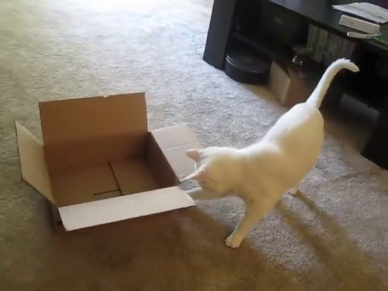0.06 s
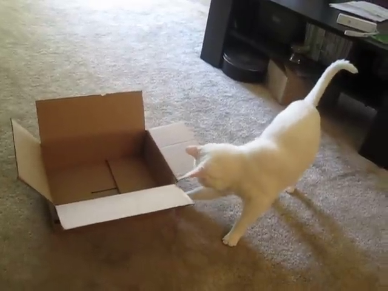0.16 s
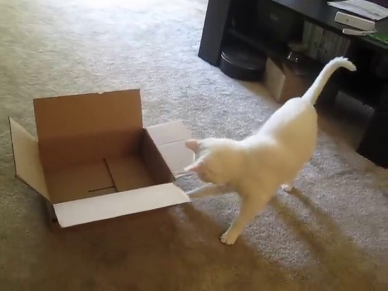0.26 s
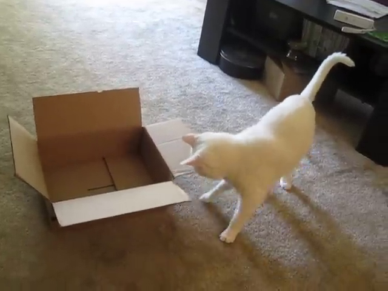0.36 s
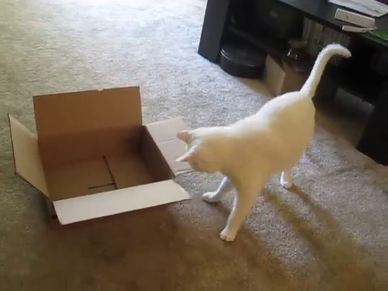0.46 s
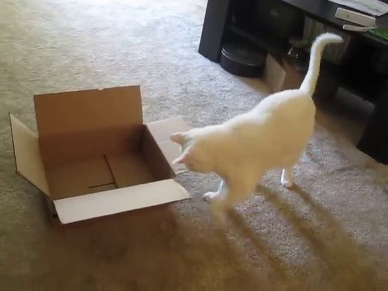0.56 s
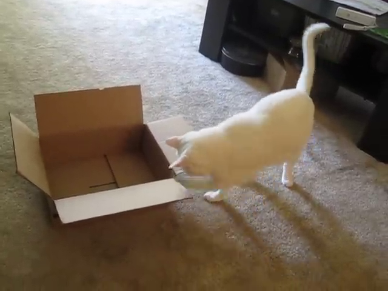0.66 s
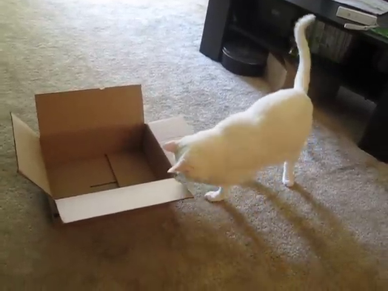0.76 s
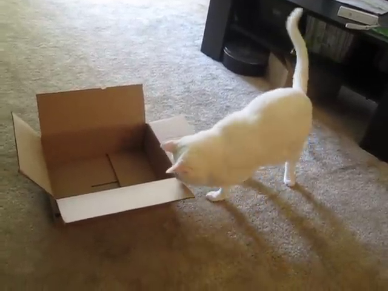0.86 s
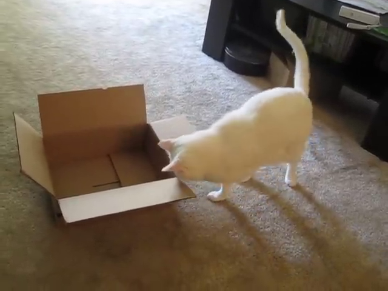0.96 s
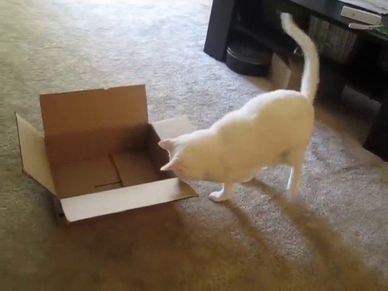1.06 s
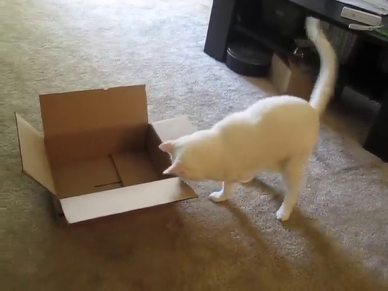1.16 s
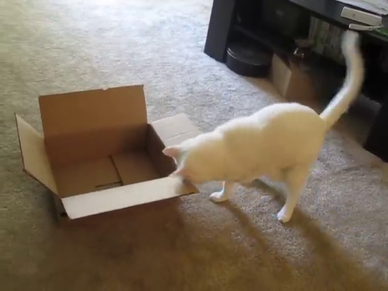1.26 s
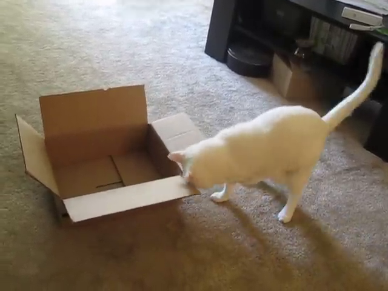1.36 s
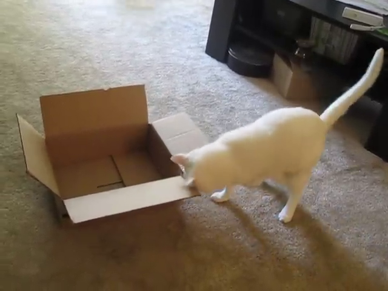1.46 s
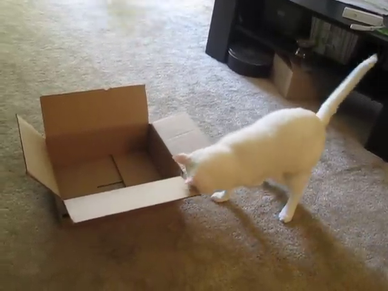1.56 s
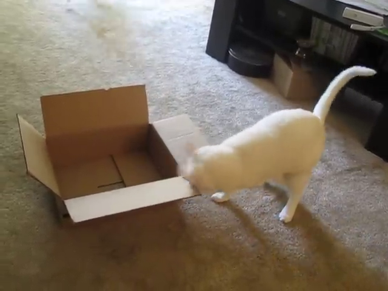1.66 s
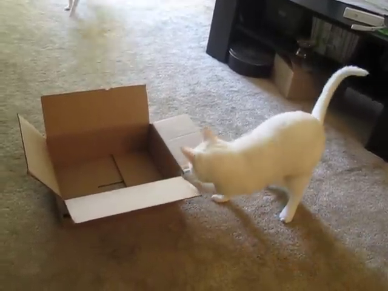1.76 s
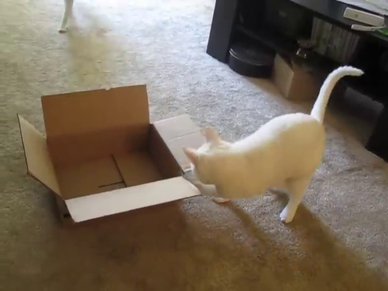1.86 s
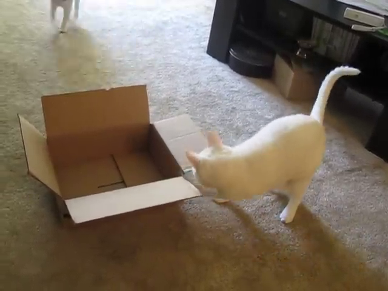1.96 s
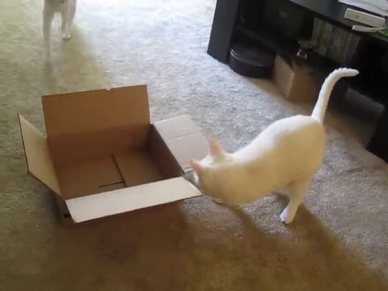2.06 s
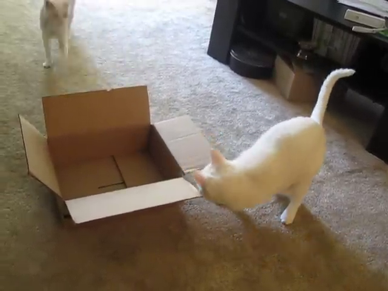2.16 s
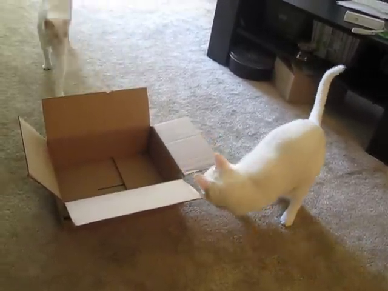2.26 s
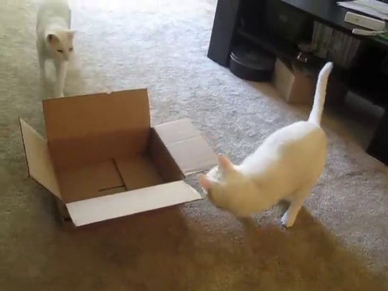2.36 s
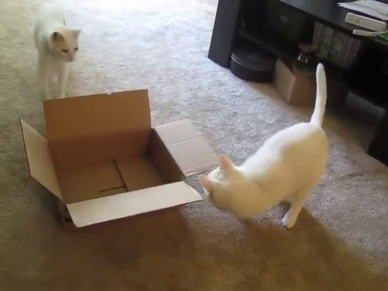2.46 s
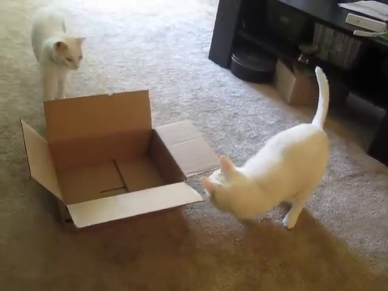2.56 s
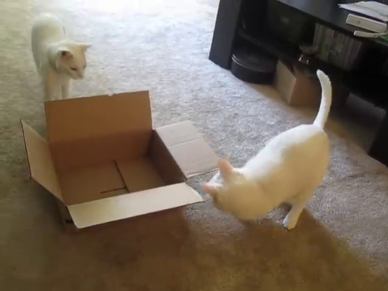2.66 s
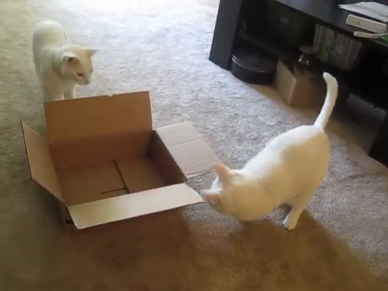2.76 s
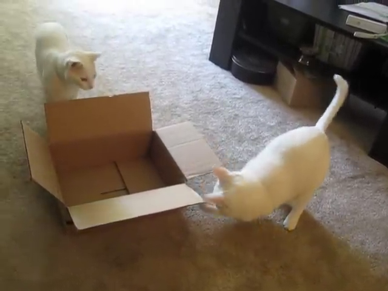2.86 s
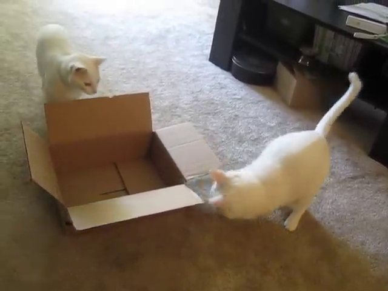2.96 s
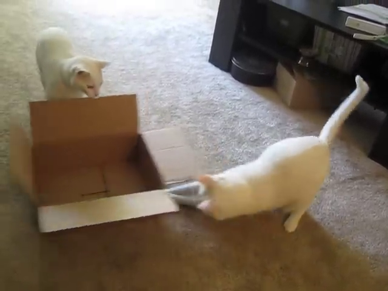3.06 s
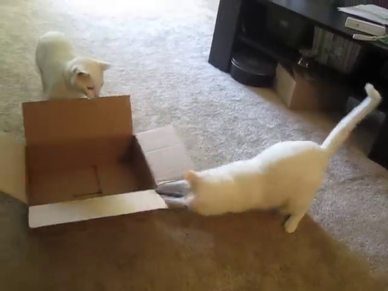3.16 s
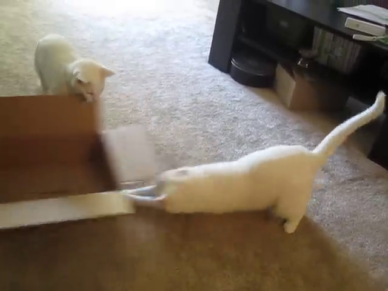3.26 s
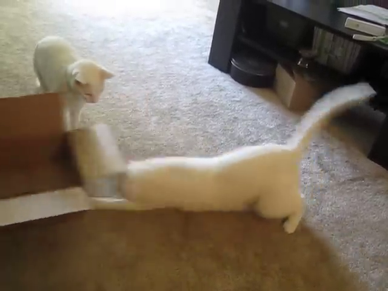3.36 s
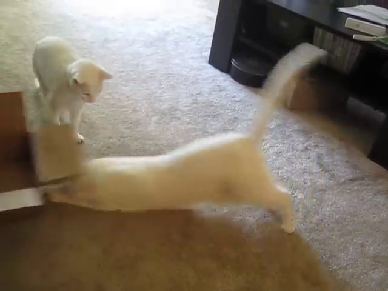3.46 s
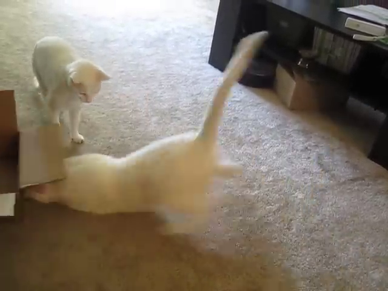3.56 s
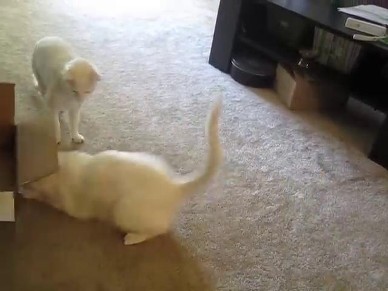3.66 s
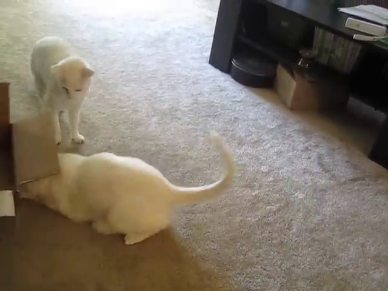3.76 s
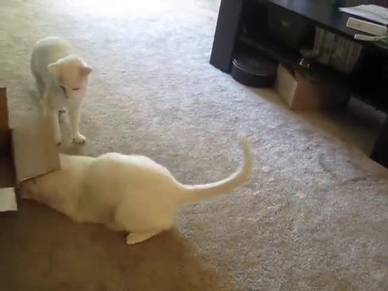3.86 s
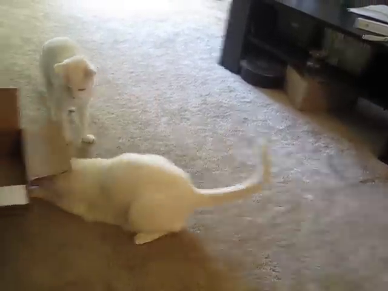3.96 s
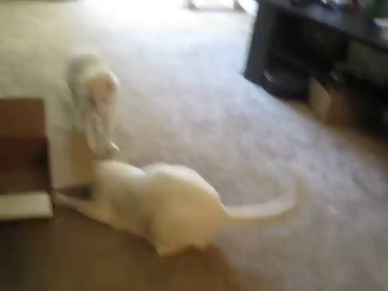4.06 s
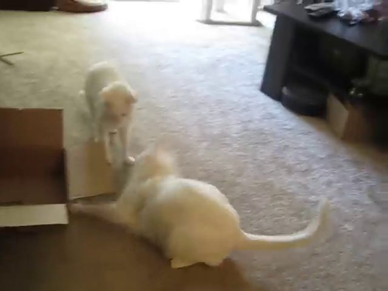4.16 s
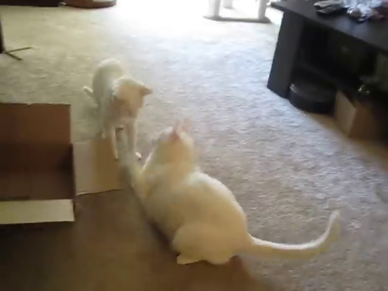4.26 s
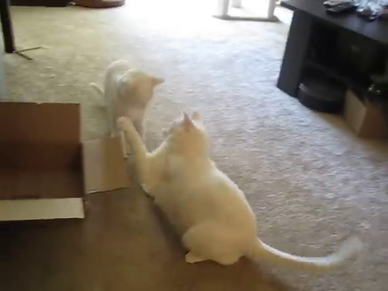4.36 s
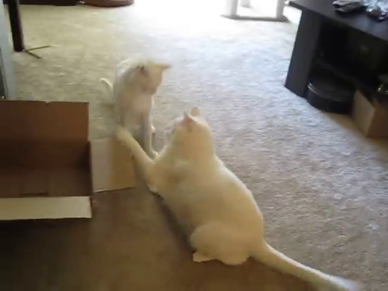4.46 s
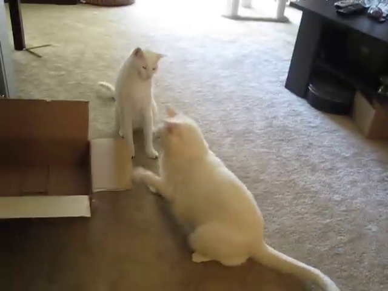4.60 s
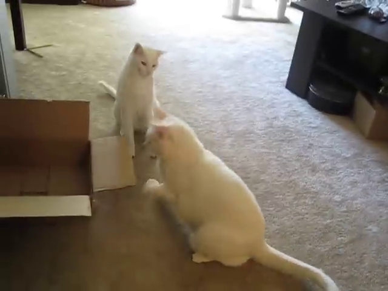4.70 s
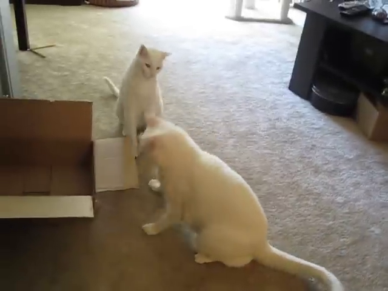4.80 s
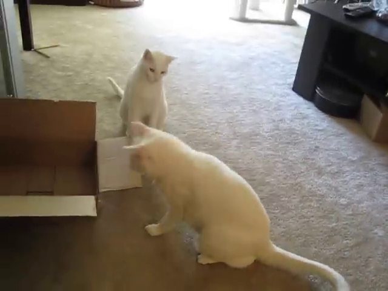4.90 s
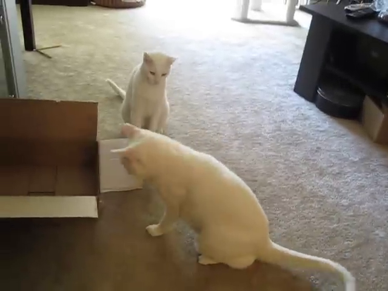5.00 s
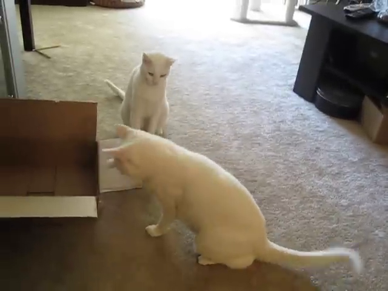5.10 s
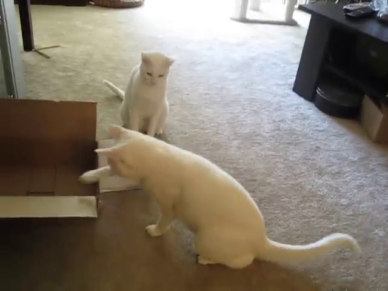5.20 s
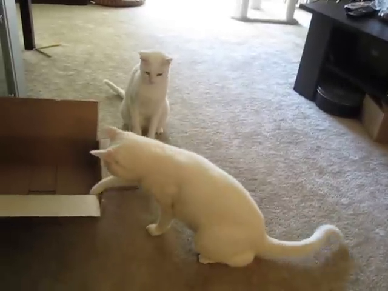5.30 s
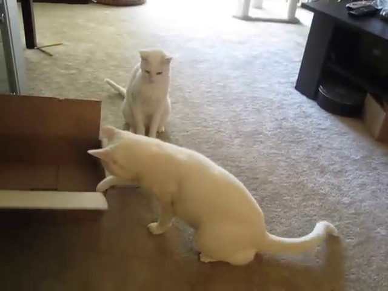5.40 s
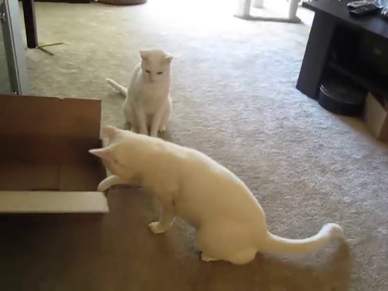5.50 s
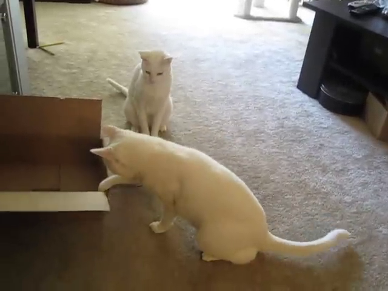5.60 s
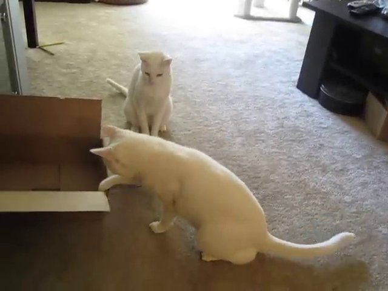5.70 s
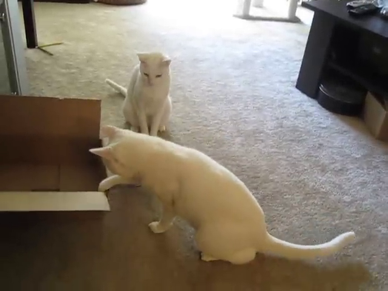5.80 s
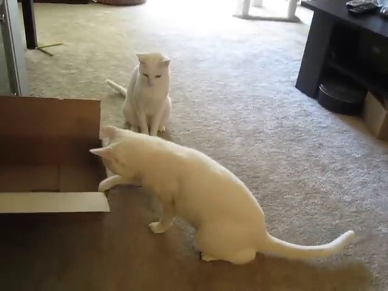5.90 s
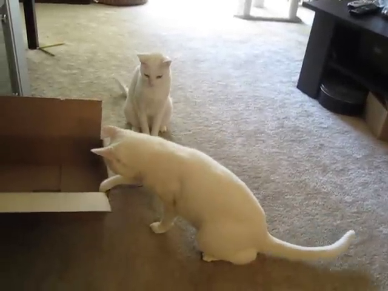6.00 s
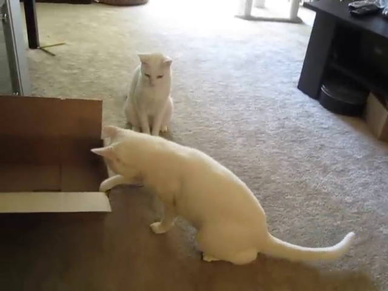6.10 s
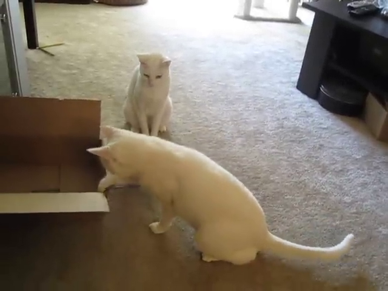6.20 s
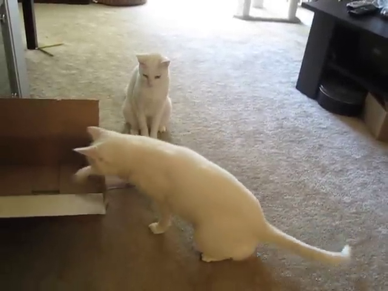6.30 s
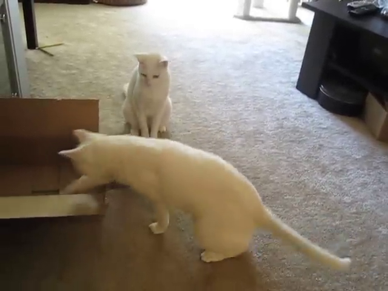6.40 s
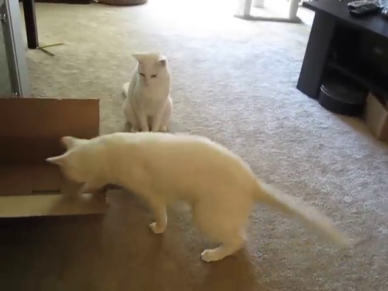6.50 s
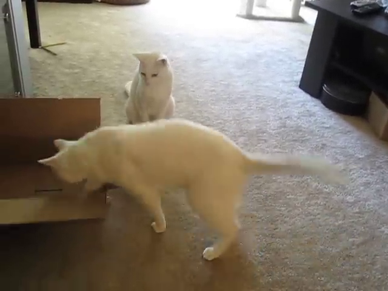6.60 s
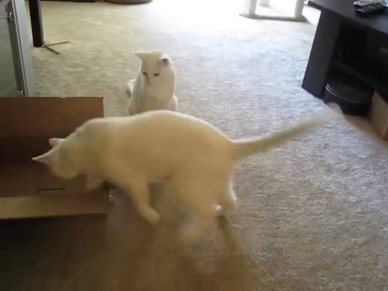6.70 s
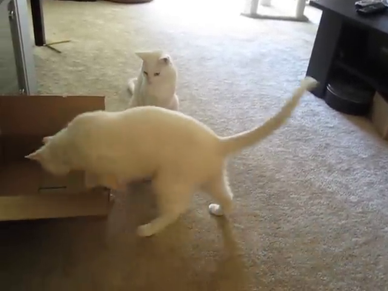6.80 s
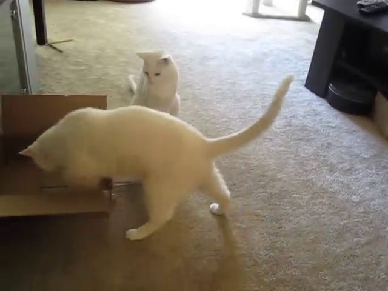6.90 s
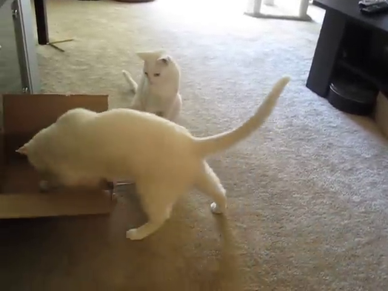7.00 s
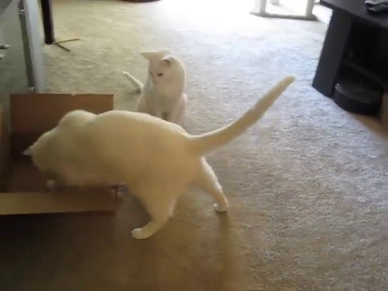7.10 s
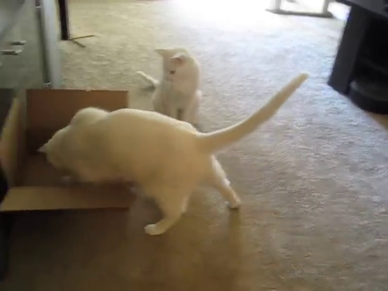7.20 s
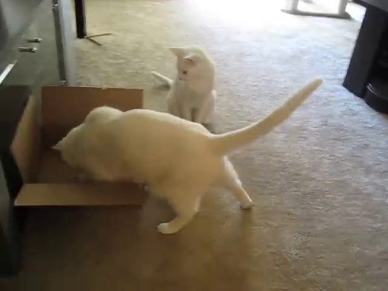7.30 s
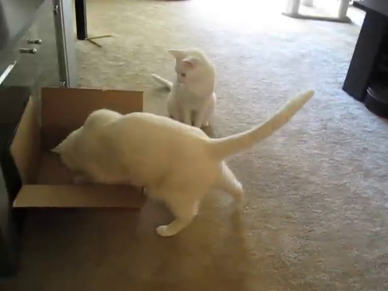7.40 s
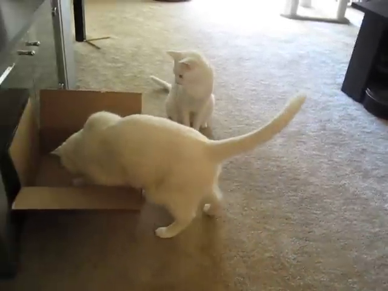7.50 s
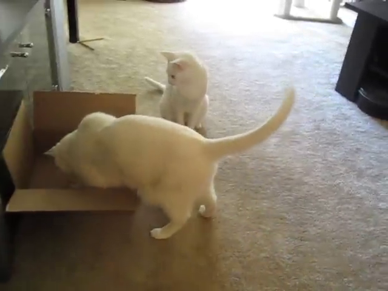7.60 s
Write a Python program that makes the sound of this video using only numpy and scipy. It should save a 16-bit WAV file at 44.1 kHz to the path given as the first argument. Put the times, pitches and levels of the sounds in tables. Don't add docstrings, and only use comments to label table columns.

```python
import sys
import numpy as np
from scipy import signal
from scipy.fft import rfft, irfft
from scipy.io import wavfile
from scipy.ndimage import uniform_filter1d

SR = 44100
rng = np.random.default_rng(int(sys.argv[2]) if len(sys.argv) > 2 else 0)


def master(y):
    cut = np.clip(np.atleast_2d(y).T, -1, 1)
    pcm = np.round(cut * 32767)
    wavfile.write(sys.argv[1], SR, pcm.astype(np.int16))


def linear_from_db(decibels):
    return 10 ** (np.asarray(decibels, float) / 20)


N = 337365
CONTROL_STEP = 20
SMOOTH_BEND = 1.64

# centre_hz, width_hz, level_db
BODY = [(166.5, 54, 11), (215, 32.6, 13.5), (305, 34.4, 5.5), (351, 51, 6), (426, 12.3, 1.5),
        (499.4, 24, 8.5), (647, 29, -3)]
# centre_hz, width_hz, level_db
FLAPS = [(689, 86, 10.5), (821, 73, 4), (916, 36, 2), (1020, 55, 3), (1150, 50, 2.5), (1250, 540, -9.5),
         (1334, 40, -9), (1410, 90, -7)]


def evened(x):
    return x / np.sqrt(np.mean(x ** 2) + 1e-20)


def read(points, hz):
    f, value = np.transpose(points)
    return np.interp(np.log(hz + 1), np.log(f + 1), value)


def add(mix, start_s, sound):
    part = mix[max(round(start_s * SR), 0):][:len(sound)]
    part += sound[:len(part)]


def ring(x, hz, width_hz):
    r = np.exp(-np.pi * width_hz / SR)
    return 2 * signal.lfilter([1 - r], [1, -r * np.exp(2j * np.pi * hz / SR)], x).real


def ring_twice(x, hz, width_hz):
    return ring(ring(x, hz, width_hz), hz, width_hz)


def modes(force, table, centre_hz, focus_db):
    hz, width_hz, db = np.transpose(table)
    octaves = abs(np.log2(hz[:, None] / np.maximum(centre_hz, 1)))
    share = linear_from_db(db[:, None] - focus_db * octaves)
    share /= np.sqrt((share ** 2).sum(0))
    return sum(ring_twice(g * force, f, w) * np.sqrt(SR / (np.pi * w))
               for g, f, w in zip(share, hz, 1.77 * width_hz))


def slips(per_s, spread_db):
    size = linear_from_db(spread_db * np.minimum(rng.exponential(1, N), 4))
    return evened(size * rng.standard_normal(N) * (rng.random(N) < per_s / SR))


def coloured(x, gain_db):
    return irfft(rfft(x) * linear_from_db(gain_db(np.fft.rfftfreq(len(x), 1 / SR))), len(x))


def patchy(x, patch_db):
    z = signal.stft(x, nperseg=256)[2]
    patches = uniform_filter1d(rng.standard_normal(z.shape), size=9, axis=0)
    patches = uniform_filter1d(patches, size=5, axis=1)
    return signal.istft(z * linear_from_db(patch_db * evened(patches)), nperseg=256)[1][:N]


def swell(peak_s, rise_s, fall_s, db, bend):
    peak_s, rise_s, fall_s, db = (np.reshape(v, (-1, 1)) for v in (peak_s, rise_s, fall_s, db))
    late_s = np.arange(0, N, CONTROL_STEP) / SR - peak_s
    away = np.maximum(-late_s / np.maximum(rise_s, .001), late_s / np.maximum(fall_s, .001))
    drop_db = 20 * away ** np.where(late_s < 0, max(bend, 1.4), bend)
    return linear_from_db(np.maximum(db - drop_db, -150)) ** 2


def smooth(track):
    return np.interp(np.arange(N) / CONTROL_STEP, np.arange(len(track)), track)


def blows():
    # start_s, peak_db, panel_hz, t60_s
    blow_rows = [(0.954, -35, 502, 0.35), (2.963, -18.5, 365, 0.019), (2.988, -17.5, 307, 0.2),
                 (3.187, -15, 400, 0.15), (3.196, -15, 557, 0.036), (3.388, -7, 216, 0.038),
                 (3.475, -10.5, 257, 0.057), (3.512, -9.5, 335, 0.071), (3.534, -12, 370, 0.033),
                 (3.645, -23.5, 1375, 0.1), (3.718, -25, 355, 0.11), (3.813, -33, 536, 0.17),
                 (3.851, -39, 1270, .067), (3.865, -27, 220, 0.27), (4.504, -42, 885, .08),
                 (4.784, -31.5, 880, 0.04), (5.272, -42, 340, 0.072), (6.447, -23.5, 359, 0.054),
                 (6.569, -15, 327, 0.1), (7.013, -25, 355, 0.21), (7.246, -24, 675, 0.01)]
    # start_s, peak_db, panel_hz, t60_s
    rock_rows = [(2.964, -41, 641, 0.04), (2.99, -27, 176, 0.083), (3.011, -14.5, 325, 0.05),
                 (3.054, -24, 327, 0.085), (3.196, -28, 1020, 0.076), (3.197, -26.5, 169.6, 0.11),
                 (3.208, -15.5, 343, 0.037), (3.266, -25.5, 320, 0.039), (3.396, -15, 427, 0.052),
                 (3.415, -14, 287, 0.047), (3.489, -22, 392, 0.062), (3.519, -17, 130, 0.067),
                 (3.539, -18, 489, 0.081), (3.537, -27, 1210, .04), (3.582, -31, 149, 0.067),
                 (4.583, -33, 480, 0.035), (4.666, -42, 496, 0.035), (5.303, -38, 190, .04),
                 (6.582, -40, 320, 0.075), (6.574, -32, 150, 0.062), (7.535, -41, 703, .08)]
    blow_rise_s, rock_rise_s = 0.0022, 0.0078
    out, t = np.zeros(N), np.arange(8000) / SR
    box_hz, _, box_db = np.transpose(BODY + FLAPS)
    rows = [(*row, blow_rise_s, 1) for row in blow_rows] + [(*row, rock_rise_s, 2) for row in rock_rows]
    chances = rng.random((len(rows), len(box_hz)))
    for (s, db, hz, t60_s, rise_s, hold), chance in zip(rows, chances):
        t60_s = max(t60_s, .01)
        near_db = box_db - 19 * hold * abs(np.log2(box_hz / hz))
        above = np.maximum(box_hz / hz - 1, 0)
        fading = linear_from_db(-60 / t60_s * 2.3 * np.outer(above, t))
        mode_hz = box_hz * (.96 + 0.094 * chance)
        box = linear_from_db(near_db) @ (fading * np.sin(2 * np.pi * np.outer(mode_hz, t)))
        panel = 1.8 * np.sin(2 * np.pi * hz * t)
        hum = (box + panel) * linear_from_db(-60 * (t / t60_s) ** hold) * np.minimum(t / rise_s, 1)
        add(out, s + .0012, linear_from_db(db - 6.5) * hum / abs(hum).max())
    return out


def knocks():
    # start_s, peak_db, pitch_hz
    knock_rows = [(0.0755, -39, 2180), (7.012, -33, 3550), (7.0105, -31, 5380), (0.955, -35.5, 930),
                  (2.988, -33, 660), (2.965, -38, 1220), (2.994, -30, 1020), (3.187, -33, 850),
                  (3.193, -33, 910), (3.388, -19, 696), (3.473, -19, 950), (3.5115, -18, 790),
                  (3.514, -20, 1250), (3.528, -23.5, 1110), (3.645, -38, 1350), (3.704, -28.5, 1250),
                  (3.813, -27, 617), (3.851, -25.5, 1220), (4.505, -45, 784), (4.785, -38, 930),
                  (5.273, -38, 1060), (6.447, -27.5, 964), (6.568, -32, 1150), (7.013, -30.5, 1160),
                  (7.152, -40, 1600), (7.176, -36, 736), (7.246, -36, 686)]
    out, t = np.zeros(N), np.arange(8000) / SR
    for s, db, hz in knock_rows:
        knock = np.sin(2 * np.pi * hz * t) + 0.48 * np.sin(2 * np.pi * 1.37 * hz * t)
        add(out, s + 0.0012, linear_from_db(db + 5.0 - 60 * t / 0.02) * np.minimum(t / 0.0017, 1) * knock)
    return out


def slaps():
    # start_s, peak_db, pitch_hz
    slap_rows = [
        (3.3895, -19, 484),
        (3.5134, -7.5, 930),
        (2.9923, -22.5, 330),
        (3.197, -40, 900),
        (3.5195, -15, 704),
        (6.4500, -29, 900),
        (6.5710, -40, 395),
    ]
    out, t = np.zeros(N), np.arange(8000) / SR
    for s, db, hz in slap_rows:
        swing = t[:round(1.5 * SR / hz)] * hz
        add(out, s, -linear_from_db(db) * np.sin(2 * np.pi * swing) * np.exp(-0.6 * swing))
    return out


def flicks():
    # start_s, peak_db, pitch_hz, t60_s
    flick_rows = [(.963, -32, 905, .02), (2.968, -32, 645, .025), (2.982, -37, 1020, .015),
                  (2.964, -31, 900, .02), (2.999, -17, 350, .025), (3.034, -30, 337, 0.027),
                  (3.014, -38, 1290, .02), (3.196, -25.5, 900, 0.023), (3.222, -24, 292, .04),
                  (3.247, -36, 330, 0.03), (3.399, -19, 390, .03), (3.409, -22, 300, .03),
                  (3.4735, -26, 2280, .015), (3.489, -20, 335, .04), (4.851, -47, 3400, .015),
                  (6.024, -51, 4300, .015), (6.302, -48, 3530, .015), (6.571, -30, 220, 0.071),
                  (3.42, -19, 300, .04), (3.452, -30, 1190, 0.018), (3.497, -28, 853, .025),
                  (3.513, -29.5, 2190, 0.036), (3.513, -29, 3580, 0.026), (3.527, -10, 332, 0.031),
                  (3.541, -26, 1200, .02), (3.565, -30, 1200, 0.021), (3.581, -29, 1250, 0.019),
                  (3.583, -26, 210, 0.038), (3.642, -25, 1330, 0.028), (3.675, -32, 1310, .025),
                  (3.701, -34, 1260, .03), (3.708, -18.5, 340, 0.024), (3.782, -35, 1210, 0.034),
                  (3.832, -31, 1210, .02), (4.579, -34, 200, .035), (4.608, -36, 200, .05),
                  (4.783, -31, 1630, 0.0084), (5.274, -39, 690, .02), (6.449, -22, 1030, 0.011),
                  (6.449, -32, 1270, 0.013), (6.515, -41, 447, .1), (6.582, -19, 327, 0.039),
                  (6.599, -23, 335, 0.052), (6.62, -35, 300, .05), (6.643, -30, 346, 0.046),
                  (6.659, -43, 1340, .02), (7.016, -32, 680, 0.019), (7.069, -36, 4600, .012),
                  (7.069, -37, 2200, .012), (7.291, -41, 5100, .012)]
    rise_turns = 1.5
    out, t = np.zeros(N), np.arange(4500) / SR
    for s, db, hz, t60_s in flick_rows:
        shape = np.minimum(t * hz / rise_turns, 1) * linear_from_db(db - 60 * (t / max(t60_s, .005)) ** 1.25)
        add(out, s, shape * np.sin(2 * np.pi * hz * t))
    return out


def ticks():
    # start_s, peak_db, centre_hz, crack_hz
    snap_rows = [(0.0757, -25, 4020, 8500), (0.0862, -45, 4370, 5000), (0.2408, -33.5, 2320, 5970),
                 (0.9545, -42, 3700, 5000), (2.9638, -38, 3440, 7000), (2.9783, -29, 5200, 3500),
                 (3.199, -20, 2980, 8200), (3.555, -27, 2720, 7000), (3.571, -30, 2960, 6000),
                 (3.578, -25, 2300, 6500), (3.6475, -37, 2990, 5000), (3.778, -38, 2450, 5000),
                 (3.793, -25, 2900, 6500), (3.8312, -30, 3190, 8500), (3.8564, -34, 3740, 9000),
                 (4.581, -42, 8860, 9050), (4.783, -27.5, 2850, 6300), (6.571, -36, 4600, 7500),
                 (6.6097, -37, 2600, 5000), (7.012, -24, 3470, 5600), (7.015, -25, 3400, 9500),
                 (7.069, -29.5, 2440, 7000), (7.091, -27.5, 3570, 7650), (7.291, -35.5, 3000, 7500)]
    # start_s, peak_db, centre_hz
    tick_rows = [(1.809, -40.5, 3240), (2.822, -42.5, 3000), (3.3911, -14.5, 4550), (5.279, -35, 4500),
                 (3.4507, -28, 3900), (3.495, -34, 3200), (3.532, -35, 3000), (3.589, -31, 3500),
                 (3.621, -37, 3600), (3.694, -38, 4000), (3.473, -17, 2300), (3.513, -21, 3600),
                 (3.6547, -26, 2430), (3.8138, -22, 1390), (4.0813, -42, 3350), (4.799, -45, 3400),
                 (4.852, -50, 3250), (5.052, -46, 4200), (6.4474, -35.5, 4000), (6.66, -31.5, 4500),
                 (6.8667, -40, 2190), (6.88, -41.5, 3400), (7.0244, -43, 2190), (7.079, -40, 4500),
                 (7.099, -39, 3900), (7.153, -39, 3450), (7.256, -41, 3400), (7.35, -44, 2470)]
    snap_crack_db, tick_crack_db = -11.5, -21
    out, t = np.zeros(N), np.arange(2000) / SR
    snap = 5.5 * (t == 0)
    rows = [(*row, snap_crack_db) for row in snap_rows] + [(*row, 5000, tick_crack_db) for row in tick_rows]
    noises = rng.standard_normal((len(rows), len(t)))
    for (s, db, hz, crack_hz, crack_db), noise in zip(rows, noises):
        burst = snap + noise * linear_from_db(-60 * t / 0.014)
        crack = ring_twice(burst, crack_hz, 3700)
        centre = ring(ring(burst, hz, .5 * hz), hz, .7 * hz)
        sound = evened(centre) - linear_from_db(crack_db + 12.0) * evened(crack)
        add(out, s + 0.00079, linear_from_db(db + 0.5) * sound / abs(sound).max())
    return out


def shoves():
    # peak_s, body_db, fall_s, flaps_over_body_db, flap_hz
    jolts = [(0.0, -35.5, 0.05, -5.5, 1040), (0.085, -39, 0.065, -4, 1050), (2.967, -28, 0.088, -2, 860),
             (3.194, -33.5, 0.091, 2, 920), (3.396, -13, 0.048, -8.5, 800), (3.477, -19, 0.18, -6.5, 800),
             (3.513, -15.5, 0.062, -19, 1000), (5.271, -37, 0.071, -4, 1020), (6.452, -27, 0.063, -3, 850),
             (6.578, -41, .1, -10, 1080), (7.018, -29, 0.036, -8.5, 885)]
    # middle_s, length_s, body_db, flaps_over_body_db, flap_hz
    drags = [(3.018, 0.2, -36, -29, 960), (3.1, 0.12, -57, -20, 1000), (3.23, 0.08, -31.5, -30, 925),
             (3.26, .04, -44, -18, 1000), (3.34, .16, -48, -17, 1030), (3.456, 0.064, -28, -25, 900),
             (3.56, 0.15, -29, -11.5, 885), (3.6, 0.073, -33, -17, 1000), (3.638, 0.14, -53, 8, 1340),
             (3.707, 0.083, -36.5, 0, 1370), (3.786, 0.033, -43.5, 9.5, 1250), (3.828, 0.03, -34, -2, 1250),
             (3.858, 0.12, -36, -4, 1210), (4.586, 0.028, -41.5, 0, 780), (4.623, 0.046, -58, -11, 830),
             (4.67, 0.17, -66, 6, 1080), (5.287, 0.069, -35.5, -7, 1020), (6.505, 0.13, -50, -13, 900),
             (6.638, 0.048, -41, -8.5, 1070), (7.073, .1, -56, 8.5, 900), (7.148, 0.072, -43, -1, 860),
             (7.23, 0.28, -43, -1.5, 870), (7.364, 0.15, -46, -18, 1010), (7.65, 0.062, -42, -5, 1150)]
    # middle_s, length_s, body_db, flaps_over_body_db, flap_hz
    nuzzles = [
        (1.214, 0.32, -42.5, -6.5, 920),
        (1.37, 0.31, -41, -1, 940),
        (1.538, 0.33, -47.5, 0.5, 930),
        (1.642, 0.052, -46, 0, 980),
    ]
    # peak_s, rise_s, fall_s, level_db
    booms = [(2.98, .04, 0.46, -47), (3.192, 0.028, 0.25, -39), (3.405, 0.035, 0.078, -32),
             (3.521, 0.031, 0.16, -26.5), (3.72, 0.073, 0.096, -42), (3.81, 0.073, 0.06, -34.5),
             (3.9, 0.036, 0.084, -36), (4.06, 0.22, 0.09, -49), (4.6, 0.042, .05, -43),
             (5.28, 0.025, 0.15, -36), (6.6, 0.1, 0.11, -42), (7.012, 0.04, 0.14, -53),
             (7.16, 0.058, 0.15, -46)]
    # centre_hz, width_hz, level_db
    boards = [(77, 35, 25.5), (92, 14, -9), (124.6, 22, -2), (137, 20, -3)]
    wall_hz, corner_hz = 335, 480
    jolt_rise_s, jolt_bend = 0.0097, 0.49
    flap_fall = 0.7
    jolt_s, jolt_db, fall_s, jolt_over_db, jolt_hz = np.transpose(jolts)
    mid_s, length_s, slide_db, slide_over_db, slide_hz = np.transpose(drags + nuzzles)
    half_s = length_s / 2

    body = np.vstack([swell(jolt_s, jolt_rise_s, fall_s, jolt_db, jolt_bend),
                      swell(mid_s, half_s, half_s, slide_db, SMOOTH_BEND)])
    flaps = np.vstack([swell(jolt_s, jolt_rise_s, flap_fall * fall_s, jolt_db + jolt_over_db, jolt_bend),
                       swell(mid_s, half_s, half_s, slide_db + slide_over_db, SMOOTH_BEND)])
    floor = swell(*np.transpose(booms), bend=0.59)
    corner_share = body[-len(nuzzles):].sum(0) / body.sum(0)
    body_hz = wall_hz + (corner_hz - wall_hz) * corner_share
    flap_hz = np.r_[jolt_hz, slide_hz] @ flaps / flaps.sum(0)

    body, flaps, floor = (smooth(np.sqrt(power.sum(0))) for power in (body, flaps, floor))
    judder = slips(per_s=1200, spread_db=-1.0)
    rumble = slips(per_s=3400, spread_db=0.5)
    return (modes(linear_from_db(-0.34) * body * judder, BODY, smooth(body_hz), focus_db=12.0)
            + modes(linear_from_db(1.5) * flaps * judder, FLAPS, smooth(flap_hz), focus_db=17.0)
            + modes(linear_from_db(1.0) * floor * rumble, boards, np.full(N, 82.), focus_db=14))


def strokes():
    # peak_s, hiss_db, fall_s, top_over_hiss_db
    scuffs = [(0.0, -54, 0.22, -9), (0.078, -46.5, 0.054, -5), (0.245, -44, 0.048, -32),
              (0.956, -46, 0.081, -12.5), (2.966, -49.5, 0.2, 1), (3.192, -39, 0.05, -5),
              (3.197, -43, 0.35, 3.5), (3.392, -32, 0.066, -3), (3.477, -33.5, 0.071, -3.5),
              (3.511, -34.5, 0.088, -26), (3.554, -37, .03, -6), (3.645, -33.5, 0.13, -10.5),
              (3.766, -53, .03, 4), (3.829, -46, .03, 0), (3.848, -40.5, .04, -2.5),
              (5.275, -49, 0.21, -1.5), (6.302, -54, 0.048, -10), (6.449, -51, 0.11, -5),
              (6.566, -46, 0.13, -8), (6.661, -50, 0.059, -9), (7.012, -38, 0.058, -5.5),
              (7.068, -51.5, 0.32, -19), (7.402, -54, .02, -4.5)]
    # peak_s, rise_s, fall_s, hiss_db, top_over_hiss_db
    rubs = [(1.236, .17, 0.07, -55, -3), (1.37, 0.14, 0.079, -55, -1), (1.665, .02, 0.027, -54, -9),
            (1.52, 0.68, 0.55, -57, -8), (2.14, 0.037, 0.18, -64.5, 0.5), (2.274, 0.022, .08, -56.5, -9),
            (2.99, 0.022, 0.15, -44, 0.5), (3.09, 0.11, 0.13, -52, 4.5), (3.36, 0.1, 0.059, -45.5, 3),
            (3.465, 0.031, 0.024, -44, 4), (3.58, 0.066, 0.044, -40, -7), (3.7, 0.3, 0.036, -49.5, 0),
            (3.79, 0.024, 0.074, -42.5, -10), (3.86, 0.047, 0.067, -46, -14), (4.5, .02, .08, -57.5, -12),
            (4.614, 0.054, 0.048, -71.5, 13.5), (4.68, .05, .03, -53.5, -25), (5.37, .1, 0.12, -67, -16),
            (6.2, 0.029, 0.11, -55.5, -7), (6.55, 0.047, .03, -68, 7), (6.9, 0.047, .02, -55, -20),
            (7.25, 0.14, 0.063, -47, -9.5), (7.55, 0.055, 0.077, -50.5, -7.5)]
    # peak_s, rise_s, fall_s, level_db
    fizzes = [
        (3.2, .01, .05, -64),
        (3.47, .06, .1, -64),
        (3.395, .006, .04, -58),
        (3.67, .05, .05, -58),
        (3.766, .005, .03, -58),
        (3.797, .008, .02, -60),
        (3.86, 0.046, .012, -61),
    ]
    # freq_hz, level_db_per_hz
    hiss_points = [(880, 11), (1500, 9.5), (1720, 3), (1900, 2.5), (2100, 8.5), (2910, 6), (4870, -2.5),
                   (6000, -9), (6560, -7.5), (7500, -10.5), (8800, -10), (10000, -14), (11800, -19.5),
                   (16000, -31)]
    scuff_s, scuff_db, scuff_fall_s, scuff_top_db = np.transpose(scuffs)
    peak_s, rise_s, fall_s, rub_db, rub_top_db = np.transpose(rubs)
    hiss = np.vstack([swell(scuff_s, 0.0051, scuff_fall_s, scuff_db, bend=0.83),
                      swell(peak_s, rise_s, fall_s, rub_db, SMOOTH_BEND)])
    low = smooth(np.sqrt(hiss.sum(0)))
    top = smooth(np.sqrt(linear_from_db(np.r_[scuff_top_db, rub_top_db]) ** 2 @ hiss))
    fizz = smooth(np.sqrt(swell(*np.transpose(fizzes), bend=1.2).sum(0)))

    def lower_db(hz):
        below = 1 / (1 + (hz / 5700) ** 8)
        sheen = 5.4 / (1 + (14600 / (hz + 1)) ** 16)
        return read(hiss_points, hz) + 10 * np.log10(below + sheen)

    def upper_db(hz):
        skirts = (1 + (5700 / (hz + 1)) ** 8) * (1 + (hz / 13000) ** 16)
        return read(hiss_points, hz) - 10 * np.log10(skirts)

    def finest_db(hz):
        return -10 * np.log10(1 + (12500 / (hz + 1)) ** 12)

    grain = 0.7 * rng.standard_normal(N) + 0.5 * slips(per_s=3500, spread_db=0.5)
    fibres = patchy(grain, patch_db=1.5)
    return (low * evened(coloured(fibres, lower_db))
            + top * evened(coloured(fibres, upper_db))
            + fizz * evened(coloured(fibres, finest_db)))


def whiskers():
    # peak_s, rise_s, fall_s, level_db, centre_hz
    brushes = [
        (1.2, 0.13, .1, -61, 3900),
        (1.38, 0.087, 0.097, -60, 6500),
        (1.37, .08, .09, -62, 8300),
        (1.36, .06, 0.086, -53.5, 2200),
        (1.6, 0.16, .14, -64, 6200),
        (1.31, .25, .3, -57, 1480),
        (1.4, .12, .12, -70, 9400),
        (6.215, .03, .03, -64, 4000),
        (6.215, .03, .03, -68, 8500),
    ]
    peak_s, rise_s, fall_s, db, centre_hz = np.transpose(brushes)
    hairs = slips(per_s=2100, spread_db=-1.0)
    powers = swell(peak_s, rise_s, fall_s, db, SMOOTH_BEND)
    return sum(smooth(np.sqrt(power)) * evened(ring_twice(hairs, hz, 0.16 * hz))
               for power, hz in zip(powers, centre_hz))


def room(x):
    # freq_hz, t60_s
    decay = [(100, 0.4), (500, 0.24), (2000, 0.81), (8000, 0.89)]
    taps = np.zeros(SR // 2)
    at = np.arange(200, len(taps) - 20, 20)
    taps[at + rng.integers(0, 20, len(at))] = rng.choice([-1., 1.], len(at))
    hz, t, z = signal.stft(taps, SR, nperseg=256)
    tail = signal.istft(z * linear_from_db(-60 * t / read(decay, hz)[:, None]), SR, nperseg=256)[1]
    return signal.fftconvolve(x, tail / np.linalg.norm(tail))[:N]


def air():
    # freq_hz, level_db_per_hz
    air_points = [(12, -12), (20, -1), (86, -4.5), (107, -7), (198, -4), (357, -7), (459, -5), (607, -10),
                  (1190, -14), (1530, -17.5), (1810, -16.5), (2320, -22), (4060, -25.5), (8410, -29),
                  (16000, -38.5)]
    # centre_hz, width_hz, over_air_db
    ducts = [(119.96, 8.9, 10.5), (195.7, 5.2, 12), (236, 6.8, 1.5), (272, 23, 0), (408, 37, 1),
             (448.2, 11, 8.5), (1150, 276, 5.5), (1250, 31, 3), (1814, 32, 4.5), (3850, 1250, 4)]
    air_db = -49.5
    frames, hz = N // 1024 + 5, np.fft.rfftfreq(4096, 1 / SR)
    a, b, patches = rng.standard_normal((frames, 2049, 3)).T
    patches = uniform_filter1d(patches, size=20, axis=0)
    patches = evened(uniform_filter1d(patches, size=4, axis=1))
    ducts_db = sum(db / (1 + (2 * (hz - f) / w) ** 2) for f, w, db in ducts)
    z = (a + 1j * b) * linear_from_db((read(air_points, hz) + ducts_db)[:, None] + 0.78 * patches)
    return linear_from_db(air_db) * evened(signal.istft(z, nperseg=4096, noverlap=3072)[1][:N])


def motor():
    whine_hz, whine_width_hz, whine_db = 4130, 6, -77.5
    chirr_hz, chirr_width_hz, chirr_db = 4160, 360, -74.5
    whine = ring(rng.standard_normal(N), whine_hz, whine_width_hz)
    chirr = ring_twice(slips(per_s=310, spread_db=3.5), chirr_hz, chirr_width_hz)
    return linear_from_db(whine_db) * evened(whine) + linear_from_db(chirr_db) * evened(chirr)


def scene():
    hits = blows() + knocks() + slaps() + flicks() + ticks()
    rubs = shoves() + strokes()
    hits = signal.lfilter(*signal.butter(2, [110, 13500], "bandpass", fs=SR), hits)
    rubs = signal.lfilter(*signal.butter(3, 62, "highpass", fs=SR), rubs)
    echo = room(linear_from_db(-12.0) * (hits + rubs))
    return (hits + rubs + echo + whiskers() + air() + motor())[None]


def top_cut(x):
    return signal.sosfilt(signal.butter(12, 16320, fs=SR, output="sos"), x)


def record(dry):
    edge = signal.firwin(1023, 15790, window=("kaiser", 9), fs=SR)
    mix = signal.oaconvolve(dry, edge[None], "same")
    return top_cut(mix)


dry = scene()
out = record(dry)
master(out)
```